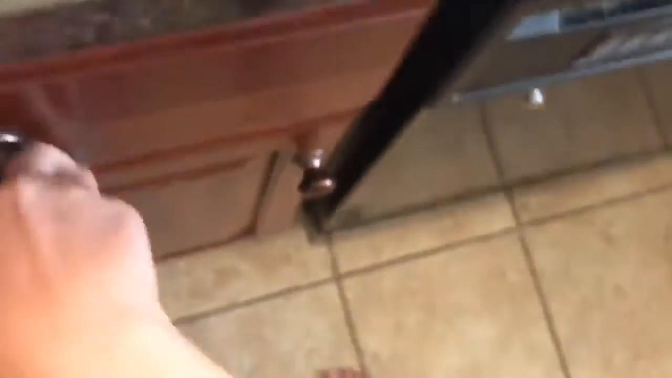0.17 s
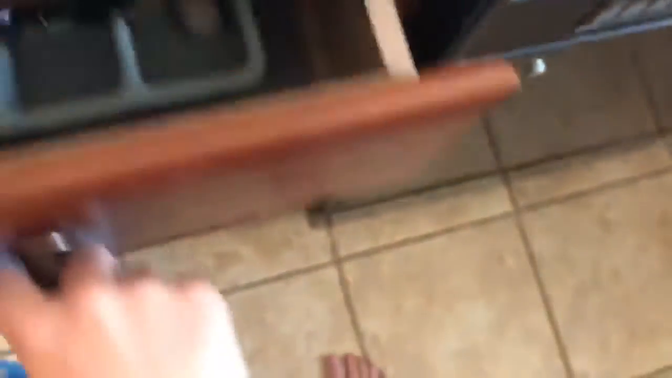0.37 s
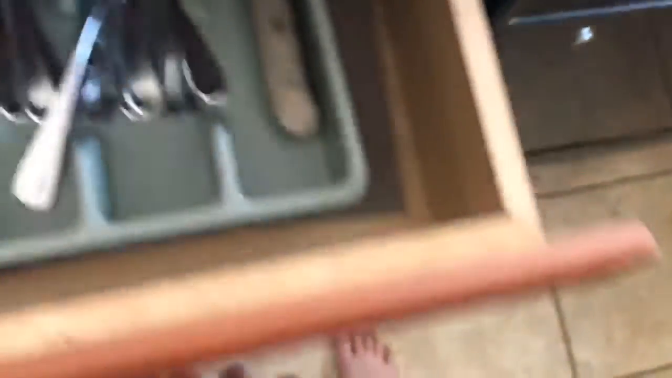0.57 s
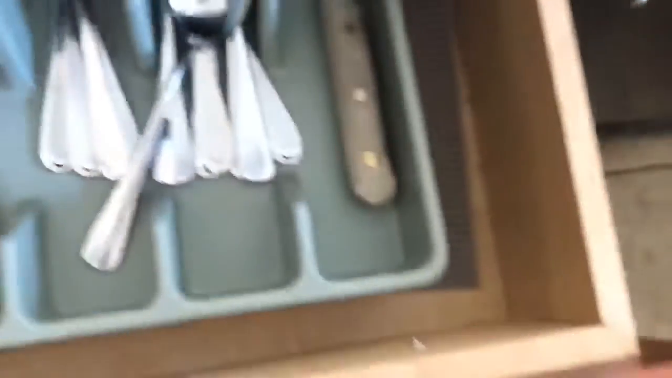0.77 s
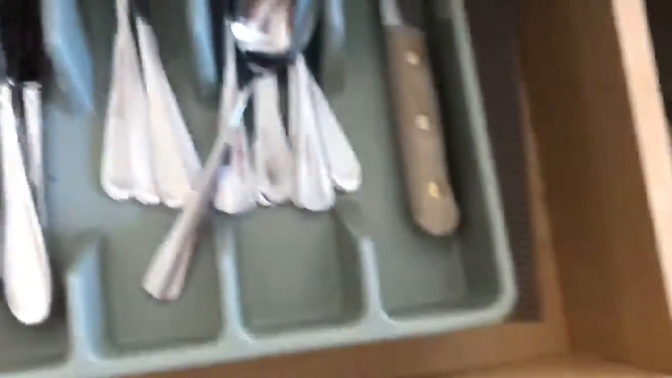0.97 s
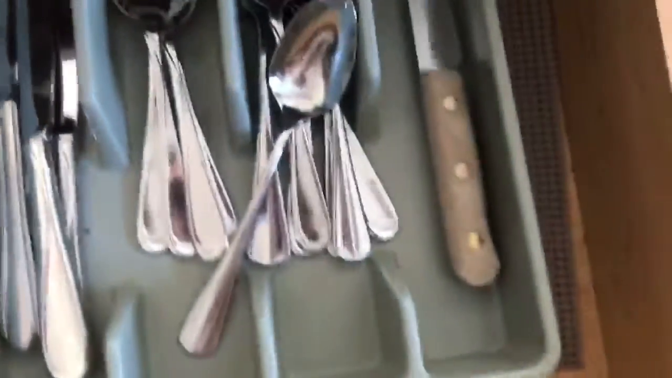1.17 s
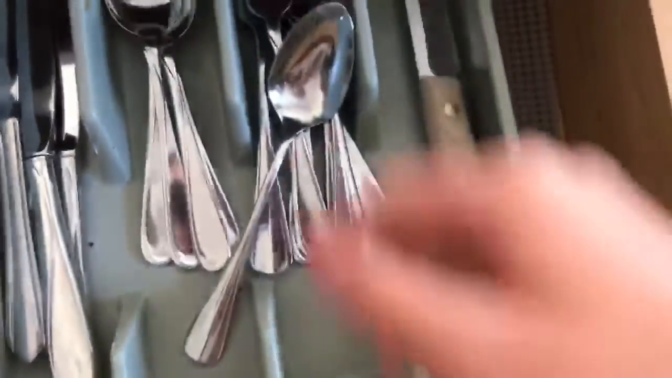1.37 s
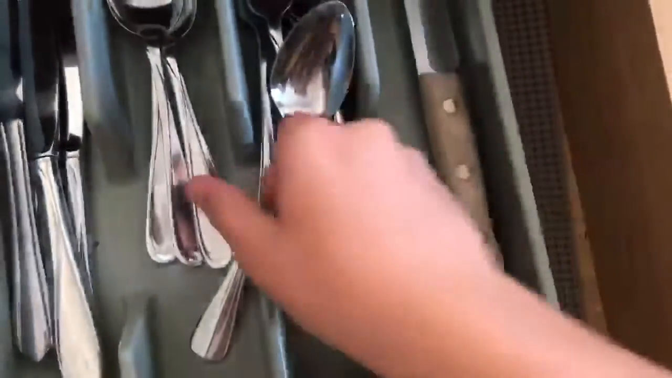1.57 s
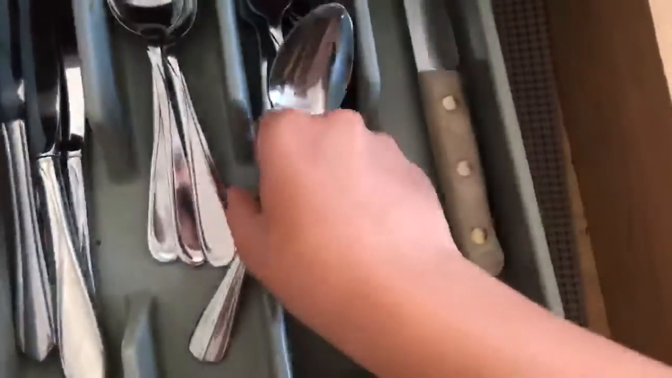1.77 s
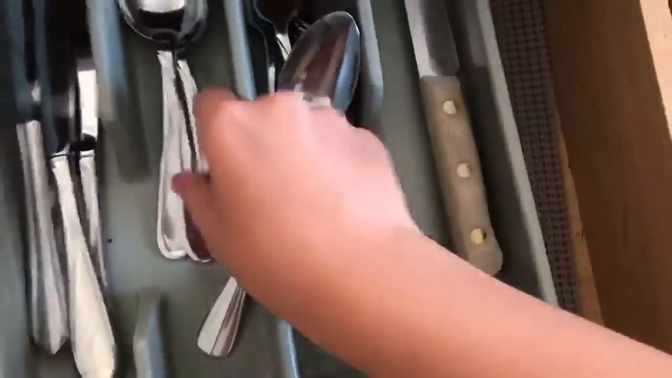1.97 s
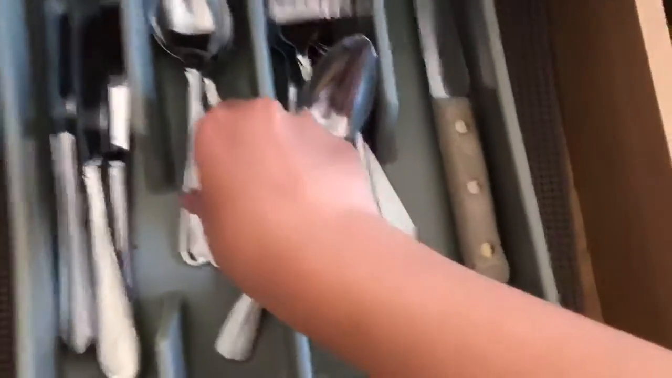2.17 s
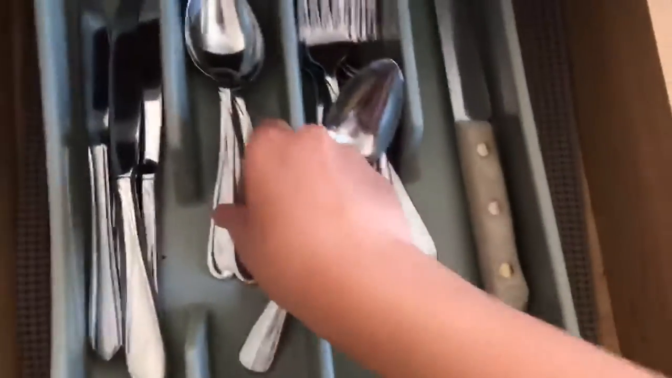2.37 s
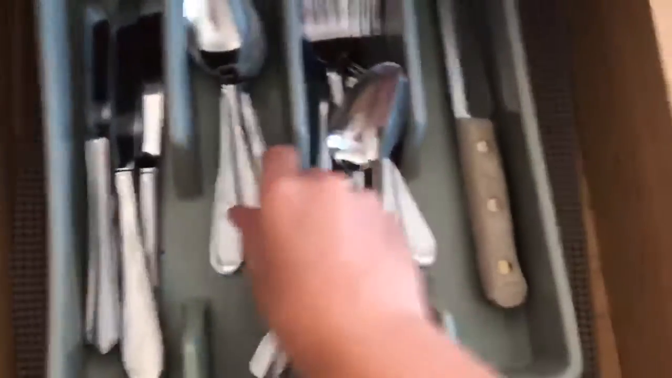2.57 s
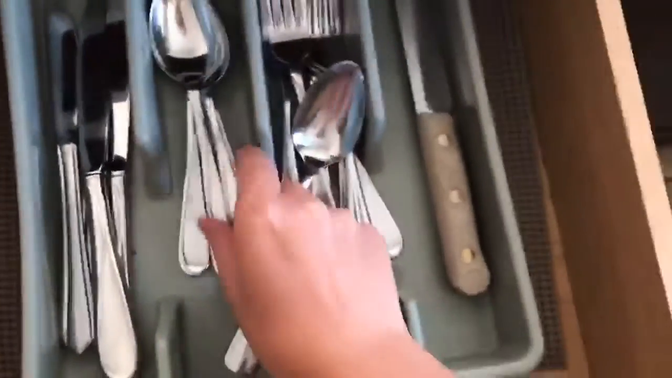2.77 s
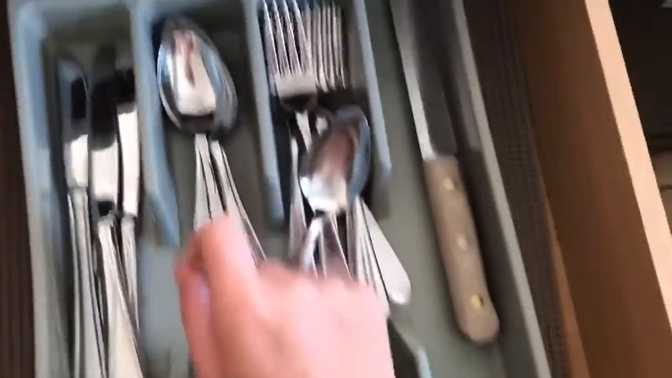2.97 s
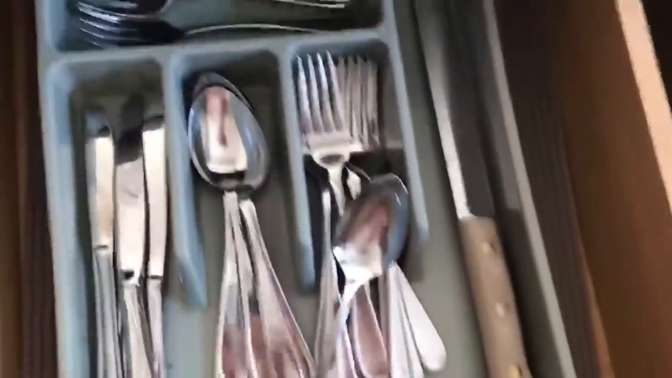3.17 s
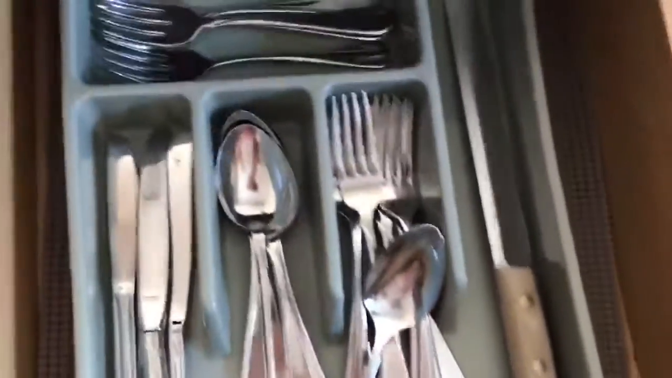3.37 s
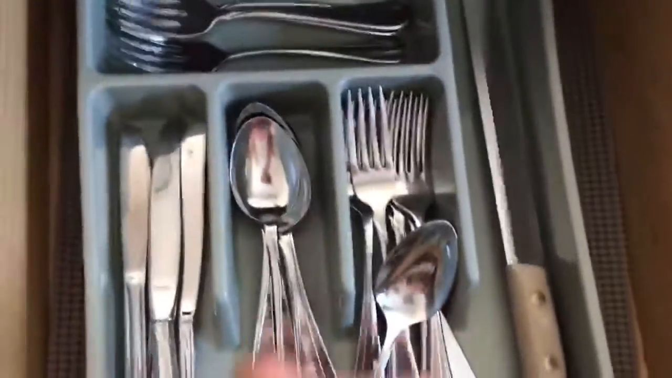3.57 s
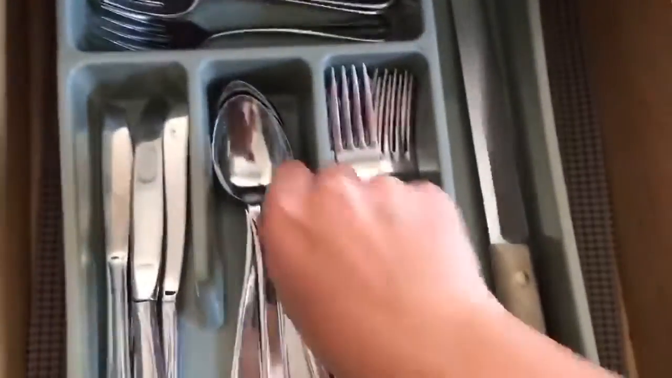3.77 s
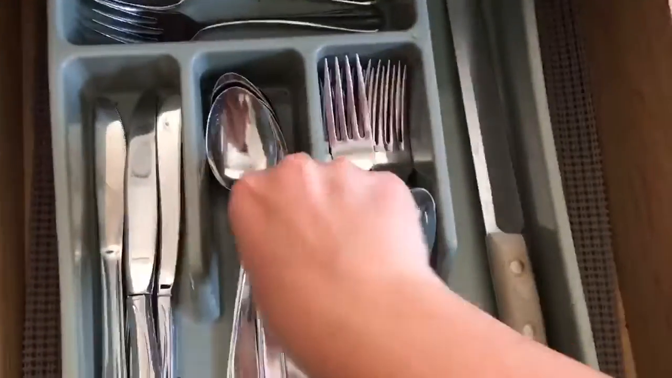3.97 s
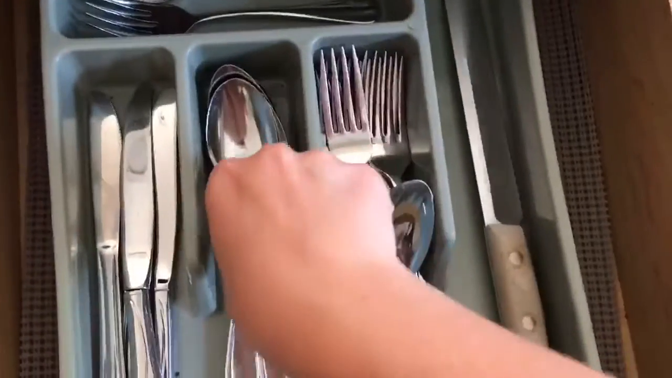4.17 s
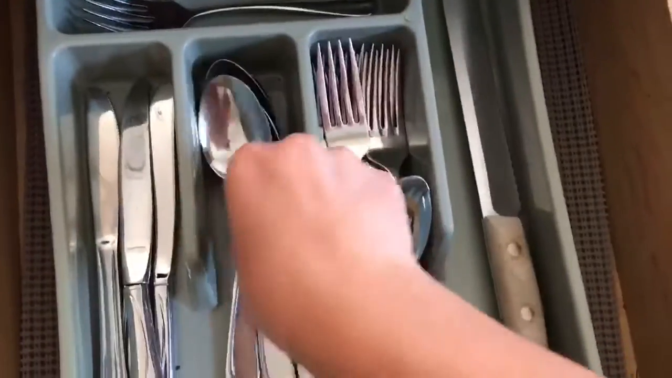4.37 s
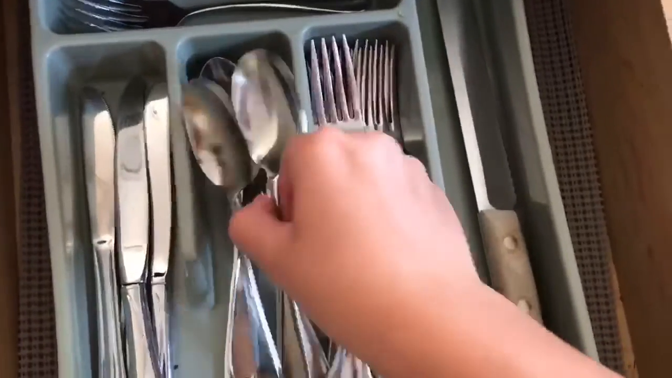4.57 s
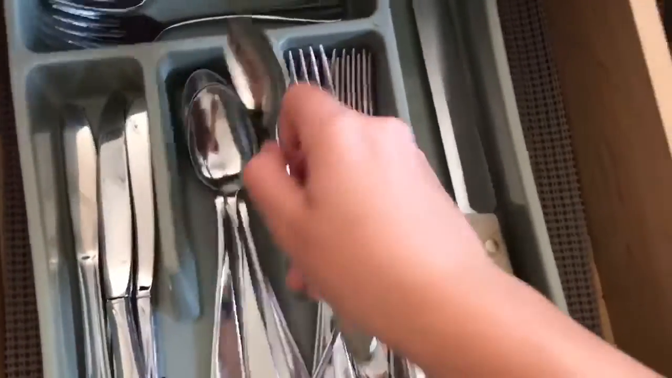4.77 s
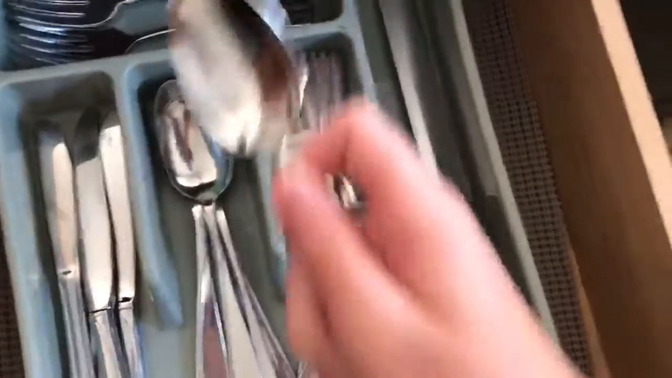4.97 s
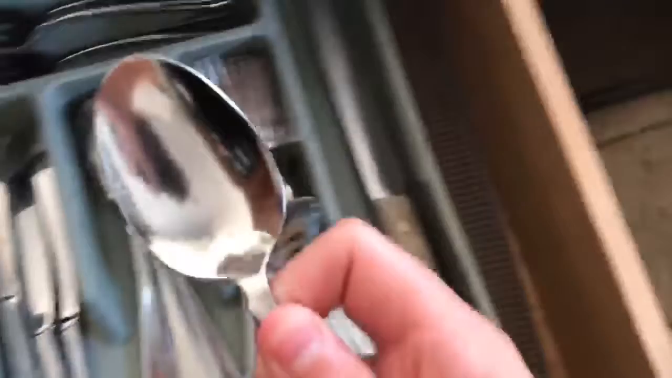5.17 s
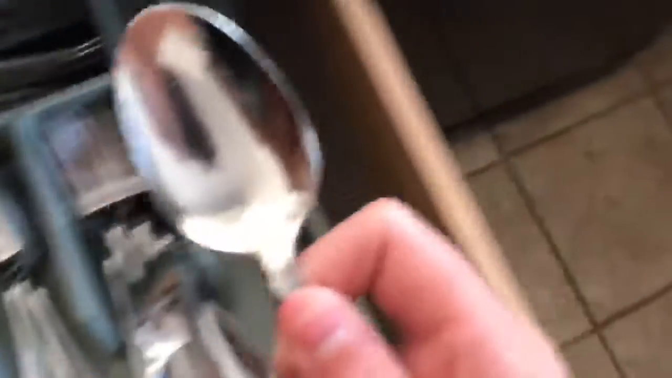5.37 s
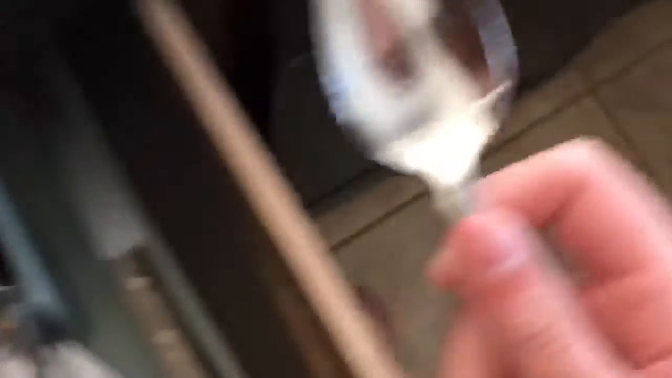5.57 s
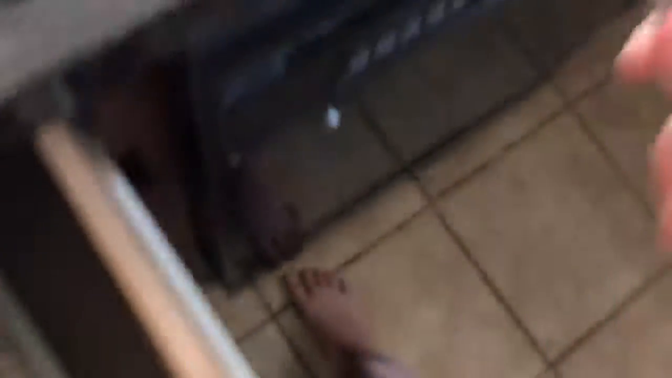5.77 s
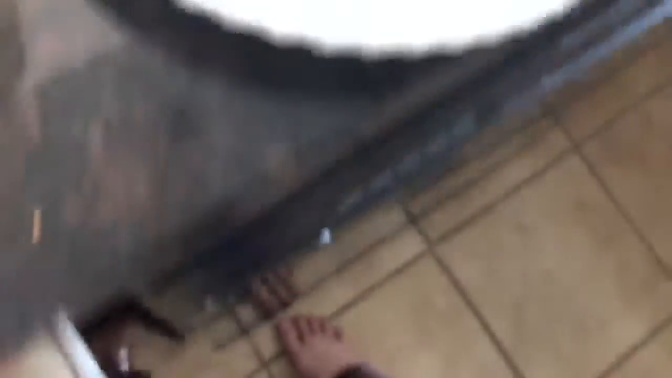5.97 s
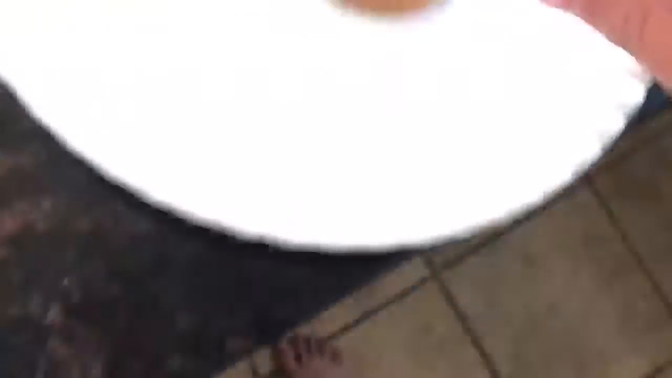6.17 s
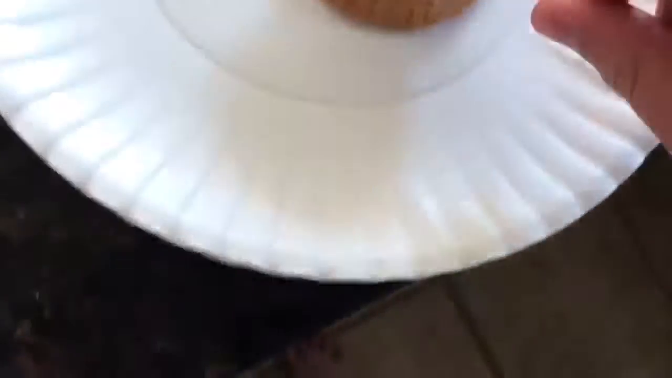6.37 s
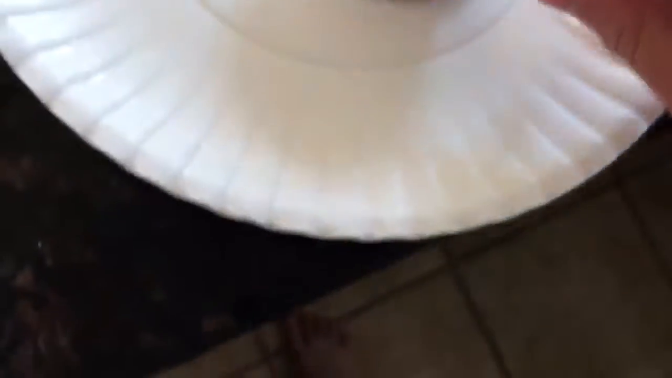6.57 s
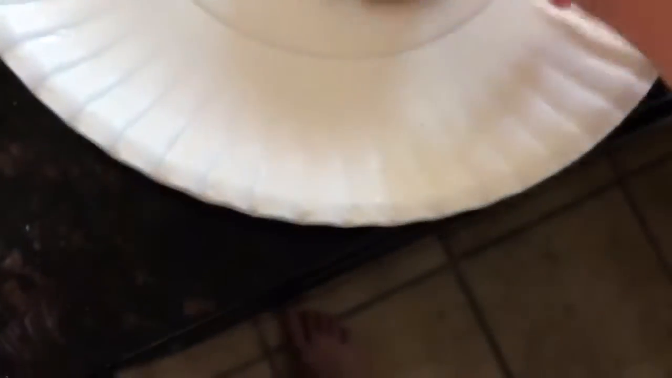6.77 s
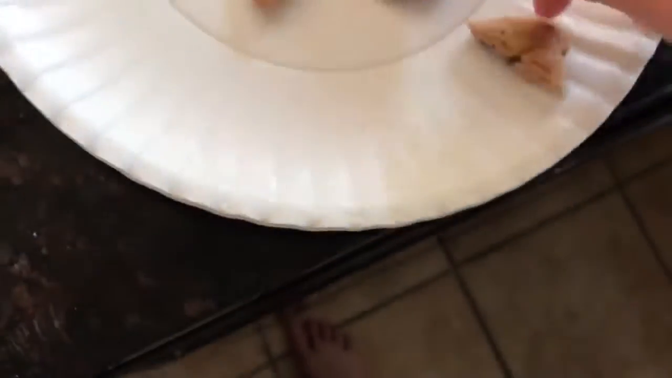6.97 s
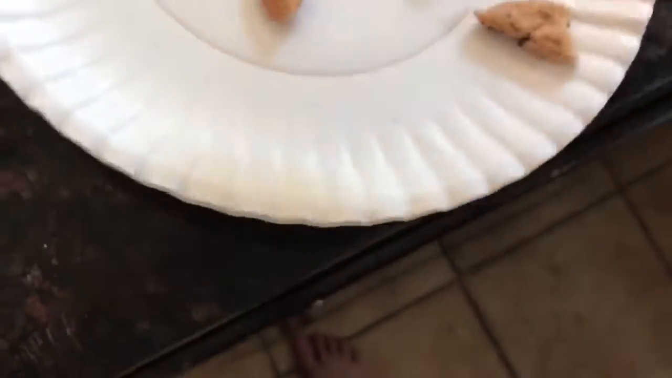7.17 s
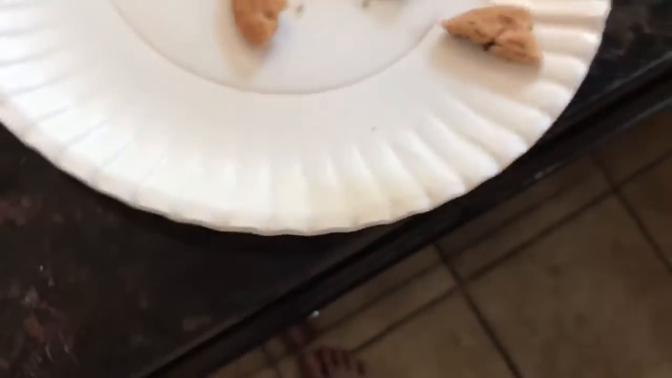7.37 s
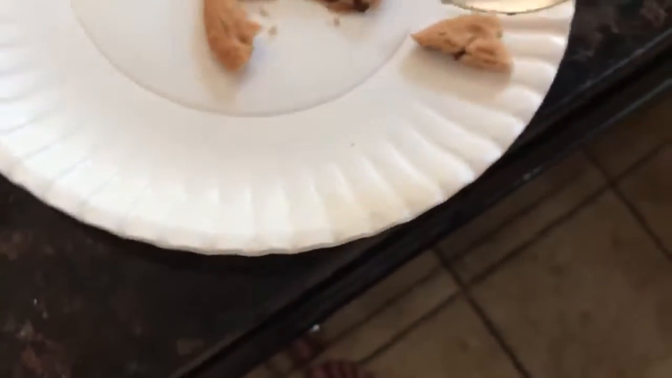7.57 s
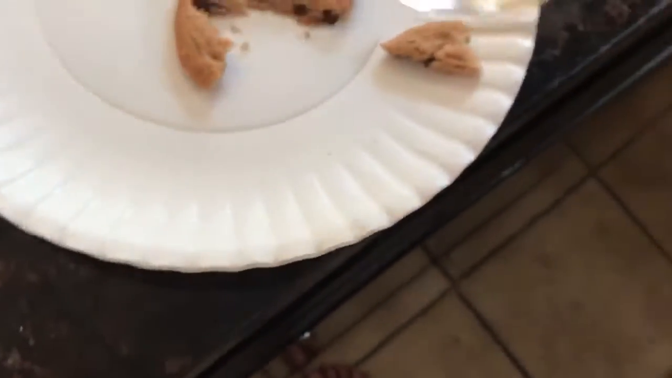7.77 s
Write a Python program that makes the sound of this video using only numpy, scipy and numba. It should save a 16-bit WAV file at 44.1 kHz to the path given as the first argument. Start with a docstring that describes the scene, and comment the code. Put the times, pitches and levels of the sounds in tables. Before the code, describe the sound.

A kitchen drawer rolls open, a hand clatters through steel cutlery in a plastic tray, the drawer rolls back, and a biscuit is crunched by a blow.

```python
"""A soft dry rub, then a kitchen drawer rolls open, close to a phone: droning rollers over noise rumble and grit.
A hand rummages through steel cutlery: ringing modes and noisy clashes, with duller knocks on a plastic tray.
One spoon is dragged free, ringing on in sines; another rocks on the tray. The drawer rolls back.
A light patter on a paper plate, then a blow breaks a biscuit: damped sines thud, grains crunch, crumbs scatter.
A tiled kitchen rings behind it all as a decaying noise echo, over quiet room air and hum."""
import sys
import numpy as np
from scipy import signal
from scipy.fft import rfft, irfft, next_fast_len
from scipy.io import wavfile
from scipy.ndimage import uniform_filter1d
from numba import njit

SR = 44100
rng = np.random.default_rng(int(sys.argv[2]) if len(sys.argv) > 2 else 0)


def materialize(psi):
    """Save the field psi as 16-bit PCM at rate SR to the path in sys.argv[1].

    A 1-D psi becomes a single channel; in a 2-D psi each row is a channel.
    """
    bounded = np.clip(np.atleast_2d(psi).T, -1, 1)
    quanta = np.round(bounded * 32767).astype(np.int16)
    wavfile.write(sys.argv[1], SR, quanta)


N = 344421
TIME = np.arange(N) / SR
AGE = TIME[:SR // 2]  # time since a strike, s

# pieces clashing in the pile, lifted ones ringing longer: start_s, level_db, t60_s
CLINK_HITS = [(.243, -32.5, 0.059), (.369, -26.5, .1), (.719, -43, 0.096), (2.032, -43, .07),
              (2.165, -39, .06), (2.454, -47, .04), (2.463, -35.5, .06), (2.499, -35, 0.099),
              (2.531, -15.5, .075), (2.5616, -6.5, 0.078), (2.706, -33, .04), (2.756, -37, 0.4),
              (2.780, -20, 0.18), (2.7957, -10, 0.096), (2.808, -13.5, 0.045), (3.862, -32, .04),
              (4.116, -43.5, 0.046), (4.1436, -37, 0.036), (4.258, -25, .037), (4.307, -31, .06),
              (4.337, -34.5, .2), (4.347, -11.5, .18), (4.4425, -17.5, .1), (4.4917, -23.5, .085),
              (4.512, -20, 0.2), (4.605, -21.5, .18), (4.672, -21.5, .14), (4.6805, -11.5, .06)]
# resonances of the piled cutlery: pitch_hz, width_hz (wider is louder), level_db
PILE_MODES = [(3430, 14, -2.5), (3820, 59, -8.5), (4800, 25, -9.5), (6580, 120, -9), (6985, 67, -7),
              (7460, 43, -12), (7500, 16, -12), (8277, 120, -16), (8430, 150, -2.5), (9130, 210, -5),
              (9540, 72, -4.5), (10000, 44, -12), (10840, 54, -6), (11080, 110, -3.5), (11750, 82, -4.5),
              (12000, 36, -9.5), (13500, 43, -9), (13100, 95, -0.5), (13300, 83, -13.5), (13800, 83, -9.5),
              (14700, 71, 1), (15200, 61, -1)]
# crowded modes of clashing steel: freq_hz, level_db (per Hz)
STEEL_SPECTRUM = [(290, -56.5), (500, -19.5), (1140, -7.5), (2130, -10.5), (3860, -4.5), (5470, -8.5),
                  (8830, -5), (10400, -10.5), (11300, -3.5), (12500, -11.5), (16000, -7)]
# plastic tray being knocked: freq_hz, level_db (per Hz)
TRAY_SPECTRUM = [(100, -21.5), (300, -8), (600, -12.5), (1100, 4.5), (1700, -2.5), (2600, -9.5),
                 (5000, -24), (12000, -36.5)]
# pulls and pushes on the drawer: full_force_s, level_db, attack_s, hold_s, release_s
DRAWER_STROKES = [(.1, -45.5, .05, 0.028, 0.2), (.49, -30, .36, .18, 0.15), (.93, -41, .55, 0.045, .7),
                  (1.22, -45, .1, 0.025, 0.13), (3.02, -49, .45, .04, .2), (3.21, -48, .06, .02, 0.27),
                  (5.61, -32, 0.27, 0.02, .45), (5.85, -30.5, 0.23, .035, 0.43),
                  (6.02, -37.5, .1, .03, .15), (6.13, -41.5, .1, 0.055, .45), (6.55, -51.5, .5, .05, .1)]
# gritty crackle: freq_hz, level_db (per Hz)
GRIT_SPECTRUM = [(470, -27), (800, -1), (2330, -7.5), (3570, -6.5), (5040, -20.5), (6760, -17.5),
                 (10500, -26), (15000, -25.5)]


def undb(db):
    """Decibels to gain."""
    return 10 ** (np.asarray(db) / 20)


def unit(x):
    """Scale to rms 1."""
    return x / np.sqrt(np.mean(x ** 2))


def fade(t60, age=AGE):
    """Exponential decay, 60 dB down after t60 seconds."""
    return np.exp(-np.log(1000) * age / max(t60, 1e-3))


def add(out, at, x):
    """Mix x into out from time `at` in seconds."""
    start = int(at * SR)
    out[start:start + len(x)] += x[:N - start]


def colour(x, spectrum, tilt_db=0, ripple_db=0):
    """Give x a spectrum, tilted in dB per octave above 1 kHz, with random peaks and dips; rms 1."""
    size = next_fast_len(len(x))
    freq = np.fft.rfftfreq(size, 1 / SR)
    octave = np.log2(freq + 1)
    hz, db = np.transpose(spectrum)
    knots = np.linspace(0, SR / 2, 200)
    ripple = np.interp(freq, knots, rng.standard_normal(len(knots)))
    shape_db = np.interp(octave, np.log2(hz), db)
    treble_db = tilt_db * np.maximum(octave - np.log2(1000), 0)
    gain = undb(shape_db + treble_db + ripple_db * ripple)
    return unit(irfft(rfft(x, size) * gain, size)[:len(x)])


def noise(spectrum, size=len(AGE), tilt_db=0, ripple_db=0):
    """Coloured noise of rms 1."""
    return colour(rng.standard_normal(size), spectrum, tilt_db, ripple_db)


def walk(rate):
    """Smooth random wander of rms 1, with `rate` new values a second."""
    hold = int(SR / rate)
    steps = np.repeat(rng.standard_normal(N // hold + 1), hold)
    return unit(uniform_filter1d(steps, hold)[:N])


def grains(spectrum, rate, spread_db):
    """Dense tiny contacts of uneven size, `rate` a second, each a brief puff of noise."""
    sizes = undb(spread_db * np.minimum(rng.exponential(size=N), np.log(100)))
    touches = (rng.random(N) < rate / SR) * sizes
    energy = signal.oaconvolve(touches ** 2, fade(.014) ** 2)[:N]
    return colour(np.sqrt(np.abs(energy)) * rng.standard_normal(N), spectrum)


def ring(modes, t60, tilt_db, scatter_db, detune):
    """Modes struck at a random spot and damped alike by whatever holds the piece."""
    hz, width, db = np.transpose(modes)[:, :, None]
    chance = rng.standard_normal((2,) + hz.shape)
    gain = undb(db + tilt_db * np.log2(hz) + scatter_db * chance[0]) * np.sqrt(np.abs(width))
    age = AGE[:int(max(t60, .01) * SR)]
    detuned_hz = hz * (1 + detune * chance[1])
    phase = 2 * np.pi * (detuned_hz * age + rng.random(hz.shape))
    tone = np.sum(gain * np.sin(phase), axis=0) * fade(t60, age)
    return np.pad(tone / np.sqrt(np.sum(gain ** 2) / 2), (0, len(AGE) - len(age)))


def strokes(rows):
    """Gain of a set of movements: each rises 30 dB over its attack, holds, and falls as far over its release."""
    depth_db = 30
    power = np.zeros(N)
    for at, db, attack, hold, release in rows:
        before, after = (at - TIME) / max(attack, 1e-3), (TIME - at - hold) / max(release, 1e-3)
        away = np.maximum(before, after)
        heard = away < 2  # the slopes run on to twice the depth
        power[heard] += undb(db - depth_db * np.maximum(away[heard], 0)) ** 2
    return np.sqrt(power)


def contacts(strikes, gap_s, loss_db, neutral_db, count):
    """Loose pieces rebound, weaker every time, pinned ones do not; above neutral_db bright, softer ones dull."""
    pinned_t60_s = .05
    brightening = .2  # treble tilt in dB per octave for each dB of force
    rows = []
    for at, db, t60 in strikes:
        gaps = gap_s * rng.uniform(.8, 1.2, count)
        for k in range(count if t60 > pinned_t60_s else 1):
            force_db = db + k * loss_db
            rows.append((at + gaps[:k].sum(), force_db, t60, brightening * (force_db - neutral_db)))
    return rows


def cutlery(hits, modes, ring_db, clash_db, clash_share, detune):
    """Each contact rings one piece and sets off a clash of the crowded modes of the pieces that it touches."""
    out = np.zeros(N)
    for at, db, t60, tilt_db in hits:
        tone = ring(modes, t60, tilt_db, scatter_db=2.0, detune=detune)
        crowd = noise(STEEL_SPECTRUM, tilt_db=tilt_db, ripple_db=5.5)
        clash = crowd * (fade(t60 * clash_share) + undb(-12.5) * fade(0.0043))
        add(out, at, undb(db) * (undb(ring_db) * tone + undb(clash_db) * clash))
    return out


def cutlery_pile():
    """Steel pieces clash in the pile; the loose ones rebound once."""
    clinks = contacts(CLINK_HITS, gap_s=.008, loss_db=-9.5, neutral_db=-17, count=2)
    return cutlery(clinks, PILE_MODES, ring_db=-5, clash_db=-2, clash_share=1, detune=.012)


def dragged_spoon():
    """The spoon strikes its neighbours as it is drawn out, chattering on its own steady modes."""
    # strikes against the neighbours: start_s, level_db, t60_s
    spoon_strikes = [(4.681, -7, .18), (4.699, -9.5, 0.18), (4.721, -7, 0.21), (4.753, -3.5, 0.16),
                     (4.767, -2, 0.071), (4.780, -7, 0.085), (4.803, -13, 0.054)]
    # resonances of the spoon: pitch_hz, width_hz (wider is louder), level_db
    spoon_modes = [(2880, 110, -15), (3610, 63, -9), (3820, 31, 0), (4710, 56, -14), (5240, 37, -10),
                   (6440, 38, -14), (6820, 39, -5), (7140, 37, -5), (7630, 28, -7), (7920, 24, -18),
                   (8290, 35, -8), (8490, 71, -12), (9030, 110, -16), (9790, 110, -17), (10000, 33, -17),
                   (10700, 28, -7), (11500, 33, -14), (11800, 63, -11), (12900, 48, -8), (13800, 41, -7),
                   (13900, 16, -9), (14300, 31, -16), (14700, 88, -10), (15400, 110, -10)]
    chatter = contacts(spoon_strikes, gap_s=.012, loss_db=-7, neutral_db=-11, count=3)
    return cutlery(chatter, spoon_modes, ring_db=-1.5, clash_db=-4, clash_share=1, detune=.0012)


def lifted_spoon(at=4.795):
    """Clear of the pile, the spoon sings on faintly in sines, damped by the fingers within a second."""
    # the spoon ringing in the air: pitch_hz, level_db, t60_s (held to 1 s at most)
    free_modes = [(996, 0, 0.66), (3580, -7, 1.3), (3817, -7, 1.5), (5227, -9, 1.2), (6438, -8, 0.93),
                  (7117, -19, 5.0), (7623, -2, 0.78), (8296, -13, 1.0)]
    out, age = np.zeros(N), TIME[:SR]
    song = sum(undb(db) * np.sin(2 * np.pi * hz * age) * fade(min(t60, 1), age) for hz, db, t60 in free_modes)
    add(out, at, undb(-52.0) * song)
    return out


def fork(at=4.572):
    """The spoon catches a fork, whose tines ping with a softened onset."""
    # tines plucked in passing: pitch_hz, width_hz (wider is louder), level_db
    tine_modes = [(3820, 60, 0.5), (4000, 60, -2.5), (4840, 57, -3), (8620, 47, -6.5)]
    out = np.zeros(N)
    ping = ring(tine_modes, .2, 0, scatter_db=1, detune=.002) * (1 - fade(.02))
    add(out, at, undb(-28) * ping)
    return out


def tray():
    """Dropped handles and every listed clink knock on the plastic tray and boom in the wooden box."""
    # handles dropping on the tray: start_s, level_db
    handle_drops = [(1.827, -30.5), (1.861, -35), (2.54, -27), (2.599, -26.5), (2.737, -42), (3.126, -42),
                    (4.379, -18.5), (4.409, -27), (4.438, -22), (4.51, -25), (4.615, -18.5), (4.662, -25),
                    (4.682, -14), (4.718, -9)]
    # boom of the box: freq_hz, level_db (per Hz)
    box_spectrum = [(60, -23.5), (150, -9.5), (300, 6), (450, -12), (900, -25.5), (4000, -72.5)]
    passed_on_db, boom_db = -15, -14  # a clink as felt by the tray; a knock as felt by the box
    out = np.zeros(N)
    for at, db in handle_drops + [(at, db + passed_on_db) for at, db, _ in CLINK_HITS]:
        knock = noise(TRAY_SPECTRUM, ripple_db=4) * fade(.04)
        boom = noise(box_spectrum) * fade(0.23)
        add(out, at, undb(db) * (knock + undb(boom_db) * boom))
    return out


def rocking_spoon():
    """A spoon rocks to and fro on the plastic: a sharp-edged tick one way, a dull one on the way back."""
    # one tick for each swing: start_s, level_db
    swings = [(1.297, -37), (1.436, -34.5), (1.5575, -37), (1.6736, -39), (1.7843, -40.5), (1.8883, -45),
              (1.9909, -46), (3.3079, -39), (3.4272, -39.5), (3.5312, -35.5), (3.6589, -36.5),
              (3.7819, -37), (3.899, -38.5), (4.012, -39.5)]
    # ring of the plastic: pitch_hz, width_hz (wider is louder), level_db
    plastic_modes = [(387, 47, 4.5), (736, 42, -10), (1179, 50, -1), (2130, 77, -18.5)]
    swing_back_s = .052
    body_db, edge_db = -7, -6  # plastic ring and steel edge of each tick
    out = np.zeros(N)
    for at, db in swings:
        for delay, tap_db in (0, -6), (swing_back_s, -15):
            body = ring(plastic_modes, .07, -2.5, scatter_db=2, detune=.035)
            tap = noise(TRAY_SPECTRUM, tilt_db=3, ripple_db=6.5) * fade(0.052)
            add(out, at + delay, undb(db) * (undb(body_db) * body + undb(tap_db) * tap))
        edge = noise(STEEL_SPECTRUM, tilt_db=-6.5) * fade(0.0096)
        add(out, at, undb(db) * undb(edge_db) * edge)
    return out


def drawer():
    """Rollers drone on a gliding note and rumble the wooden box; grit crackles in the runners."""
    # rumble of the runners: freq_hz, level_db (per Hz)
    runner_spectrum = [(24, -52), (40, -35), (76, -10.5), (161, -17.5), (221, -15.5), (302, -1.5),
                       (379, -15), (483, -17), (615, -17), (865, -34.5), (1200, -27.5), (1560, -47),
                       (2640, -120)]
    # note of the rollers, opening then closing: time_s, pitch_hz
    roller_note = [(.3, 270), (.47, 280), (.66, 316), (.95, 320), (1.25, 275), (5.4, 295), (5.62, 310),
                   (5.9, 309), (6.2, 280), (6.4, 265)]
    full_speed_db, coast_s = -35, 0.1397  # level at full speed; how long speed lags behind force
    rumble = noise(runner_spectrum, size=N) * undb(2 * walk(30))
    grit = grains(GRIT_SPECTRUM, rate=550, spread_db=2)
    throb, overtone = undb(3.5 * walk(45) - 1), undb(4 * walk(30))
    waver = 1 + .012 * walk(35)
    loudness = strokes(DRAWER_STROKES)
    lag = 1 / (coast_s * SR)
    speed = np.clip(signal.lfilter([lag], [1, lag - 1], loudness) / undb(full_speed_db), 0, 1)
    pitch_hz = np.interp(TIME, *np.vstack(roller_note).T) * waver
    phase = 2 * np.pi * np.cumsum(pitch_hz) / SR
    # the note stands out only when the drawer runs fast
    drone = np.sqrt(speed) * (throb * np.sin(phase) + undb(-16.5) * overtone * np.sin(2 * phase))
    return loudness * (drone + undb(-3) * rumble + undb(-17.5) * grit)


def catch(at=.385):
    """The drawer thumps as it leaves its catch: a low burst of noise."""
    out = np.zeros(N)
    thump = noise([(30, -25), (80, 16), (130, -5), (300, -28), (2000, -60)]) * fade(0.26)
    add(out, at, undb(-33) * thump)
    return out


def rattling_load():
    """The load jolts a few times and rattles at random, harder the harder the drawer rolls."""
    # the load jolting in the moving drawer: start_s, level_db
    load_jolts = [(0.5296, -35.5), (0.7118, -38), (0.7643, -37), (1.2202, -47.5), (5.6063, -45.5),
                  (5.713, -43), (5.8, -34.5), (5.898, -39.5), (5.9968, -41.5), (6.0466, -47), (6.1793, -51)]
    # clatter of the load: freq_hz, level_db (per Hz)
    jolt_spectrum = [(300, -11), (900, 2), (2000, -2.5), (3300, -0.5), (5000, -10.5), (7000, -9),
                     (10000, -25.5), (16000, -28)]
    rattles_per_s, rattle_db = 29, -15  # lesser jolts, about this far under the rolling
    out, rolling = np.zeros(N), strokes(DRAWER_STROKES)
    chance = rng.random((int(rattles_per_s * N / SR), 2))
    lesser = [(u * N / SR, rolling[int(u * N)] * undb(rattle_db) * (.5 + size)) for u, size in chance]
    for at, gain in [(at, undb(db)) for at, db in load_jolts] + lesser:
        if gain > 0:
            rattle = noise(jolt_spectrum, ripple_db=4)
            add(out, at, gain * rattle * fade(0.11))
    return out


def skidding():
    """Steel skids on plastic: scraping grains, also ringing the modes of the pile."""
    # cutlery skidding along the tray: full_force_s, level_db, attack_s, hold_s, release_s
    skid_strokes = [(.35, -39.5, .26, 0.052, .1), (.372, -32.5, .012, 0.024, 0.065),
                    (4.232, -51.5, .03, .015, 0.079)]
    # scrape of steel on plastic: freq_hz, level_db (per Hz)
    skid_spectrum = [(590, -11.5), (1000, 0), (2530, -4.5), (4520, -13.5), (6400, -0.5), (11400, -16.5),
                     (14800, -8), (16000, -19)]
    skid = grains(skid_spectrum, rate=700, spread_db=3.5)
    squeal = unit(signal.oaconvolve(skid, ring(PILE_MODES, .04, -2, scatter_db=3, detune=.02))[:N])
    return strokes(skid_strokes) * (skid + undb(-6) * squeal)


def rubbing():
    """Skin rubs on wood with a soft dry hiss of noise."""
    # rubs: full_force_s, level_db, attack_s, hold_s, release_s
    rub_strokes = [(.28, -47, 1.24, 0.17, .1), (1.1, -57.5, 0.37, .03, .17)]
    # hiss of skin: freq_hz, level_db (per Hz)
    hiss_spectrum = [(300, 0.5), (1500, 2.5), (4000, -4), (8000, -3.5), (15000, -5.5)]
    return strokes(rub_strokes) * noise(hiss_spectrum, size=N)


def brushing():
    """Fingers brush over the handles: very dense grains of uneven level."""
    # brushes: full_force_s, level_db, attack_s, hold_s, release_s
    brush_strokes = [(1.5, -59.5, 0.17, 0.047, 0.95), (2.65, -61.5, 0.45, .02, 0.11),
                     (3.02, -60.5, .3, 0.0294, .7), (3.98, -59.5, .5, 0.26, .3)]
    bristle = grains(GRIT_SPECTRUM, rate=2500, spread_db=2.5) * undb(2.5 * walk(20))
    return strokes(brush_strokes) * bristle


def squeaks():
    """Handles drag over one another and sing briefly in a narrow band, with a grainy grip."""
    # steel squeaking on steel: full_force_s, level_db, length_s, pitch_hz
    squeak_rows = [(.32, -45, .07, 5700), (1.68, -57, .03, 4200), (2.205, -58, .05, 6300)]
    attack_s, release_s = .04, .15
    out = np.zeros(N)
    for at, db, length, hz in squeak_rows:
        band = [(.8 * hz, -30), (hz, 0), (1.25 * hz, -30)]
        out += strokes([(at, db, attack_s, length, release_s)]) * grains(band, rate=400, spread_db=3)
    return out


def blow(at=6.6248):
    """A blow thuds through plate and worktop in damped sines and cracks the biscuit in a noise burst."""
    # resonances of plate and worktop: pitch_hz, width_hz (wider is louder and shorter), level_db
    counter_modes = [(142.3, 29, 1.5), (673, 36, -12), (965, 130, -6.5), (1650, 76, -24), (1800, 26, -24),
                     (2310, 48, -10), (3160, 100, -16.5), (3600, 29, -29)]
    out = np.zeros(N)
    hz, width, db = np.transpose(counter_modes)[:, :, None]
    gain = undb(db) * np.sqrt(np.abs(width) / 100)
    damping = np.exp(-np.pi * np.maximum(width, 40) * AGE)
    thud = np.sum(gain * np.sin(2 * np.pi * hz * AGE) * damping, axis=0)
    crack = noise([(100, -7), (400, 0.5), (1100, 2.5), (2400, -9.0), (3500, -13), (5000, -41), (15000, -44)])
    add(out, at, undb(-10.5) * thud + undb(-16.5) * crack * fade(0.062))
    # the biscuit gives way and the blow lands on the worktop, which booms
    add(out, at + 0.00419, undb(-13.0) * thud)
    boom = noise([(30, -28), (80, -5), (150, -1.5), (330, -10.5), (700, -21), (4000, -43)]) * fade(0.39)
    add(out, at + 0.017, undb(-22.5) * boom)
    return out


def crumbling_biscuit():
    """The biscuit bursts into crunching grains and a fine spray of crumbs."""
    # the burst, then its bits settling: full_force_s, level_db, attack_s, hold_s, release_s
    crumble_strokes = [(6.66, -32, 0.059, 0.016, 0.24), (6.87, -49.5, 0.41, 0.053, 0.2)]
    # fine crumbs spraying over the paper: full_force_s, level_db, attack_s, hold_s, release_s
    spray_strokes = [(6.655, -32.5, 0.026, .03, .15)]
    # breaking biscuit: freq_hz, level_db (per Hz)
    crunch_spectrum = [(350, -33), (600, -9), (1240, -1.5), (2210, -6), (3390, -5), (5710, -13.5),
                       (6830, -8), (10300, -11.5), (13400, -9), (16000, -13)]
    # fine crumbs: freq_hz, level_db (per Hz)
    spray_spectrum = [(2000, -30), (7000, -17), (12000, 4), (16000, -1)]
    out = strokes(crumble_strokes) * grains(crunch_spectrum, rate=4000, spread_db=2.5)
    return out + strokes(spray_strokes) * grains(spray_spectrum, rate=3000, spread_db=3)


def plate_patter():
    """A light patter on the paper plate just before the blow, then crumbs landing: short puffs of noise."""
    # one patter before the blow, then crumbs landing after it: start_s, level_db
    patter_hits = [(6.5993, -47.5), (6.8995, -38), (6.9324, -42), (6.989, -40.5), (6.9977, -44.5),
                   (7.1616, -56)]
    out = np.zeros(N)
    for at, db in patter_hits:
        patter = noise([(800, -25), (2200, -12), (3200, 0), (7000, -4), (15000, -12)]) * fade(.025)
        add(out, at, undb(db) * patter)
    return out


def kitchen(x, wet_db, low_t60, high_t60):
    """Diffuse echo of tiles and cupboards from decaying noise; the treble dies first."""
    # colour of the echo: freq_hz, level_db (per Hz)
    wall_spectrum = [(100, -1), (300, 4), (1100, 7.5), (3000, -3.5), (7000, -0.5), (15000, -6.5)]
    age = TIME[:SR]
    wash = noise(wall_spectrum, size=SR)
    low = signal.sosfilt(signal.butter(2, 5000, fs=SR, output="sos"), wash)
    high = signal.sosfilt(signal.butter(2, 5000, "high", fs=SR, output="sos"), wash)
    # the minus sign joins the bands in phase; the echo swells in softly
    tail = (low * fade(low_t60, age) - high * fade(high_t60, age)) * (1 - fade(.05, age))
    return undb(wet_db) * signal.fftconvolve(x, unit(tail) / np.sqrt(SR))[:N]


def background():
    """Quiet room air in coloured noise, with wavering sines of mains and fridge hum."""
    # hum of mains and fridge: pitch_hz, level_db
    hum_tones = [(59.2, -61.5), (172.3, -66), (317.6, -73)]
    # room air: freq_hz, level_db (per Hz)
    air_spectrum = [(15, -59), (25, -27.5), (40, -15.5), (64, -3.5), (82, -17.5), (108, -15), (141, -14),
                    (236, -14), (277, -24.5), (317, -14), (463, -27), (16000, -53.5)]
    air_db = -55
    hum = sum(np.sqrt(2) * undb(db + walk(7)) * np.sin(2 * np.pi * hz * TIME) for hz, db in hum_tones)
    return hum + noise(air_spectrum, size=N) * undb(air_db + .7 * walk(3.2))


def scene():
    """All sources close to the microphone, with the room behind them."""
    metal = cutlery_pile() + dragged_spoon() + lifted_spoon() + fork()
    plastic = tray() + rocking_spoon()
    rolling = drawer() + catch() + rattling_load()
    friction = skidding() + rubbing() + brushing() + squeaks()
    biscuit = blow() + crumbling_biscuit() + plate_patter()
    near = metal + plastic + rolling + friction + biscuit
    return (near + kitchen(near, wet_db=-19.0, low_t60=0.89, high_t60=0.52) + background())[None]


@njit
def follow(x, attack, release):
    """Envelope that rises fast and sinks slowly."""
    out, e = np.empty(len(x)), 0.
    for i in range(len(x)):
        e += (abs(x[i]) - e) * (attack if abs(x[i]) > e else release)
        out[i] = e
    return out


def record(dry):
    """The phone thins the deep bass, turns itself down in loud clatter, rounds the peaks and cuts the top."""
    top_hz = 15800
    x = signal.sosfilt(signal.butter(3, 42, "high", fs=SR, output="sos"), dry)
    envelope = follow(x[0], 1 / (.003 * SR), 1 / (.2 * SR))  # 3 ms up, 200 ms down
    gain = np.maximum(envelope / undb(-7), 1) ** -.7
    rounded = np.tanh(.9 * gain * x) / .9
    return signal.sosfilt(signal.ellip(12, .2, 90, top_hz, fs=SR, output="sos"), rounded)


dry = scene()
out = record(dry)
materialize(out)
```